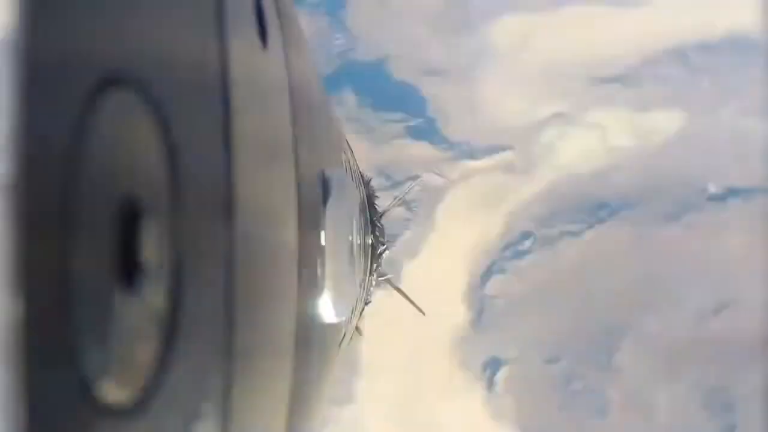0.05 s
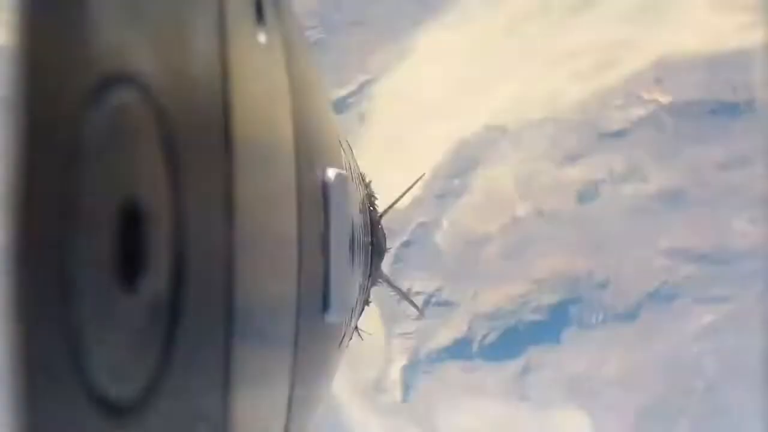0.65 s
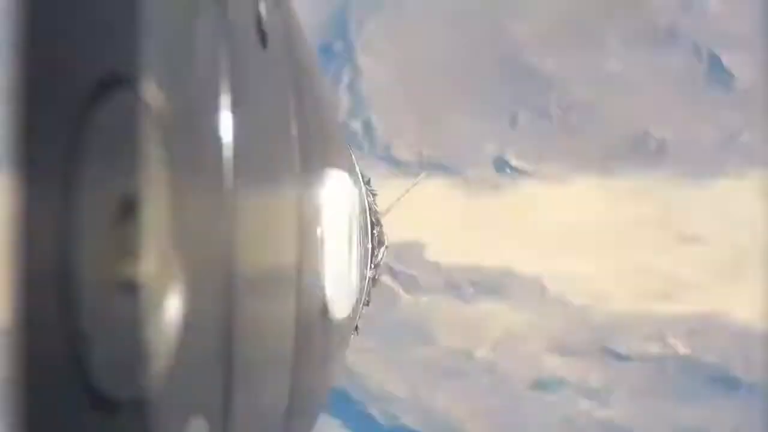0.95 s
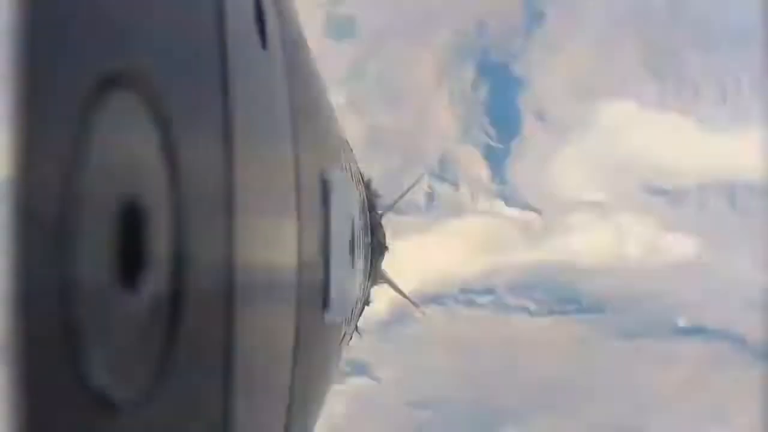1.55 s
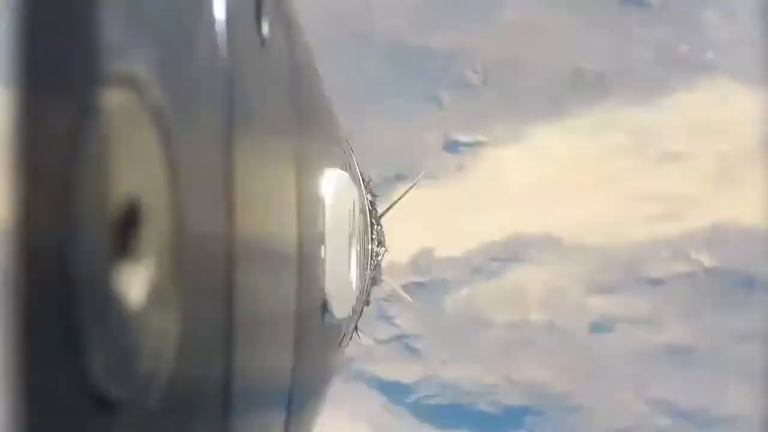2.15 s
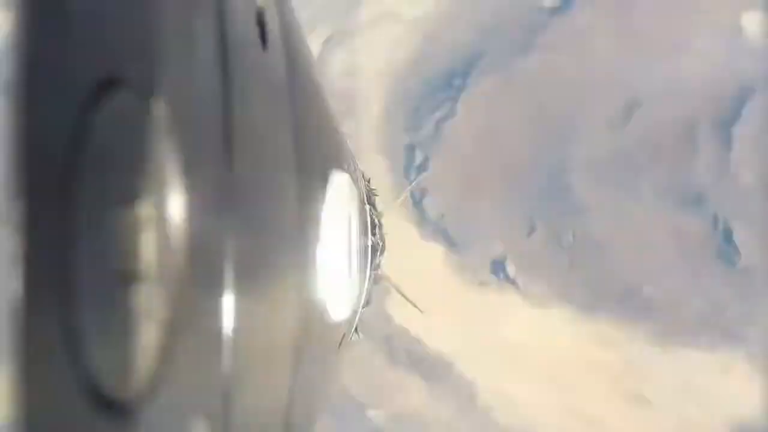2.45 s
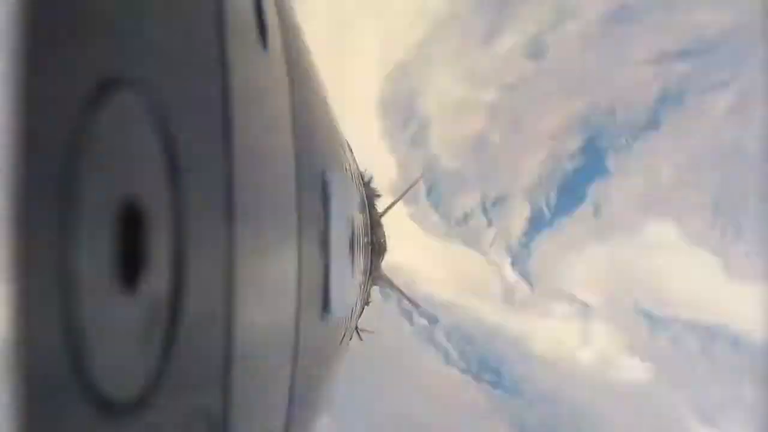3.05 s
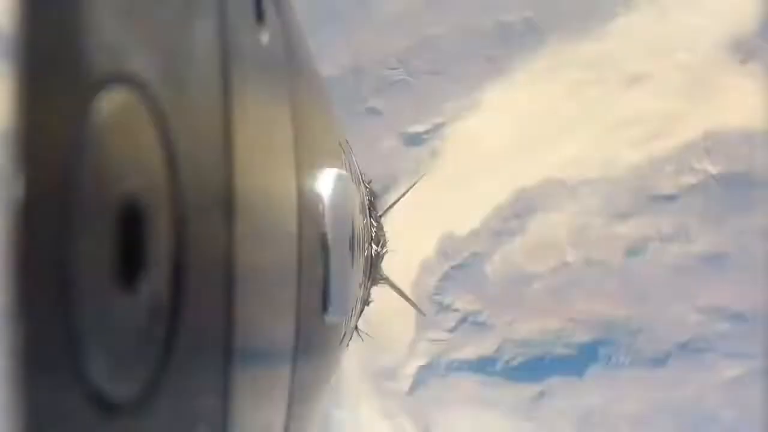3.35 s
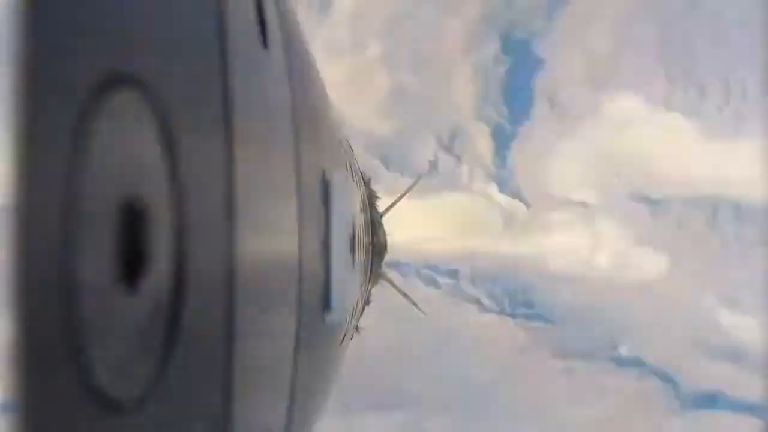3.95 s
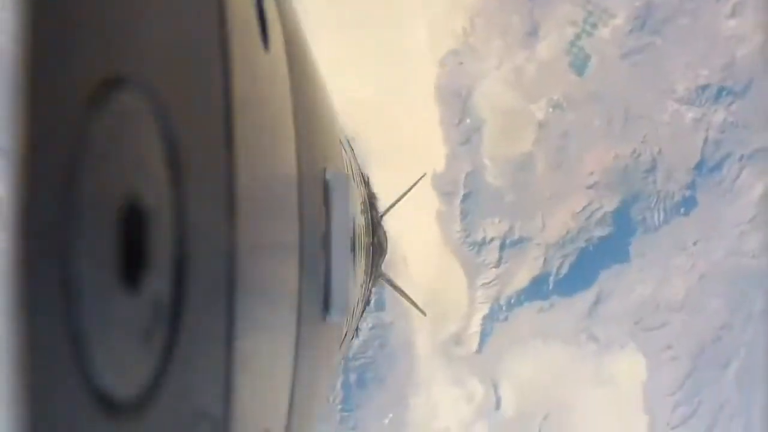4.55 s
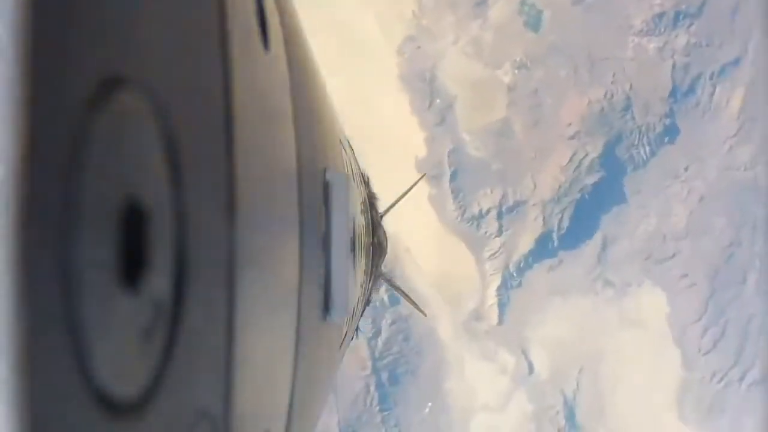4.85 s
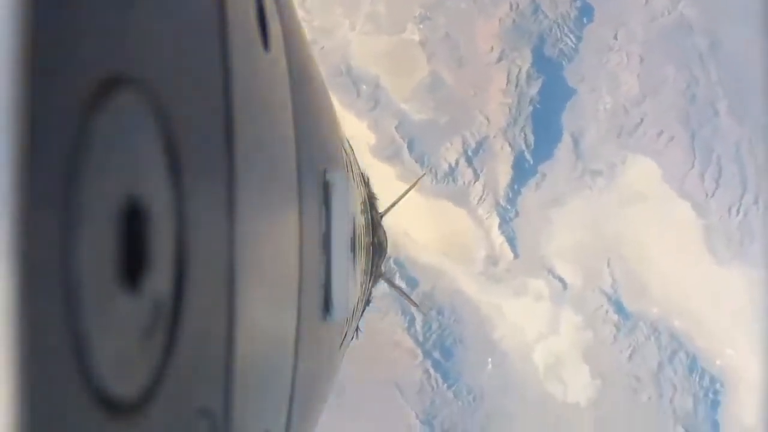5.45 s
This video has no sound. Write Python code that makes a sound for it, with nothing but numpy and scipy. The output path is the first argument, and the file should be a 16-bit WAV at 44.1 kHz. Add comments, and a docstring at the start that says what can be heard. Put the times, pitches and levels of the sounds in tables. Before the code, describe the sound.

A low metal hull hum with scattered knocks, then a loud burst of clattering, groaning and cable scraping that ends in a sharp bang.

```python
"""Aboard a spinning rocket above the air, where sound travels through the hull.
The hull hums, and loose parts knock. Two weights on cables are fired loose to stop the spin.
The cables whirr, scrape off the hull and make it groan, then let go with a bang.
A small camera overloads and holds each of its slow samples, which mirrors the sound into the treble."""
import sys
import numpy as np
from scipy import signal
from scipy.fft import rfft, irfft, next_fast_len
from scipy.io import wavfile
from scipy.ndimage import uniform_filter1d

SR = 44100
rng = np.random.default_rng(int(sys.argv[2]) if len(sys.argv) > 2 else 0)


def transcribe(signal):
    """Save signal, clipped to [-1, 1], as a 16-bit WAV file at the path in sys.argv[1]."""
    frames = np.atleast_2d(signal).T
    limited = np.clip(frames, -1, 1)
    pcm = np.round(limited * 32767).astype(np.int16)
    wavfile.write(sys.argv[1], SR, pcm)


N = 250929
T = np.arange(N) / SR
RELEASE_S, LET_GO_S = 3.86, 4.557   # the weights are fired loose; the cables leave the hull


def from_db(db):
    """Turn decibels into a number to multiply by."""
    return 10 ** (np.asarray(db) / 20)


def rms_one(x):
    """Scale a signal to an average strength (rms) of one."""
    return x / np.sqrt(np.mean(x ** 2) + 1e-20)


def noise(spectrum):
    """Noise of strength one; rows of pitch_hz, level_db set only its tone colour."""
    size = next_fast_len(N)
    hz, db = np.transpose(spectrum)
    bins_hz = np.maximum(np.fft.rfftfreq(size, 1 / SR), 1)
    gain = from_db(np.interp(np.log(bins_hz), np.log(hz), db))
    return rms_one(irfft(rfft(rng.standard_normal(size)) * gain, size)[:N])


def drift(rate):
    """A random wobble of strength one that turns about `rate` times a second."""
    knots = rng.standard_normal(N // 8)
    return rms_one(np.interp(T * rate, np.arange(len(knots)), knots))


def add(out, s, sound):
    """Mix a sound in at s seconds."""
    at = max(round(s * SR), 0)
    out[at:at + len(sound)] += sound[:max(N - at, 0)]


def ring(hz, t60, rise):
    """A struck tone builds up for `rise` seconds, then fades by 60 dB in `t60` seconds."""
    t = T[:int((1.3 * t60 + rise) * SR)]
    build = np.sin(np.pi / 2 * np.minimum(t / rise, 1))
    return np.sin(2 * np.pi * hz * t) * build * from_db(-60 * np.maximum(t - rise, 0) / t60)


def resonate(x, hz, width_hz):
    """Let through a narrow band around one pitch."""
    r = np.exp(-np.pi * width_hz / SR)
    feedback = [1, -2 * r * np.cos(2 * np.pi * hz / SR), r * r]
    return signal.lfilter(np.array([1, 0, -1]) * (1 - r * r) / 2, feedback, x)


def burst(s, t60):
    """A loudness curve that jumps up at s seconds and dies away."""
    out = np.zeros(N)
    add(out, s, from_db(-60 * T[:int(1.5 * t60 * SR)] / t60))
    return out


def swell(s, half_length):
    """A loudness curve that rises to its top at s seconds and falls again."""
    return np.exp(-.5 * np.minimum(((T - s) / half_length) ** 2, 100))


# Tone colour of the faint hiss: pitch_hz, level_db
HISS_COLOUR = [(20, -10), (60, 1), (200, -7), (700, -16.5), (4400, -13.5), (8000, -23), (10000, -43)]

def hiss():
    """A faint, even hiss."""
    return from_db(-67.5) * noise(HISS_COLOUR)


# Tone colour of the hull's hum and the camera's hiss: pitch_hz, level_db
HUM_COLOUR = [(20, -9.5), (55, -1), (105, 0), (144, -0.5), (275, -1.5), (424, -6), (560, -12), (700, -11),
              (900, -19), (1500, -22), (3280, -27.5), (4900, -29.5), (5700, -36)]

def hum():
    """The hull hums, its low part swelling and sinking; a thin electronic whine joins after the spin."""
    steady = noise(HUM_COLOUR)
    low = signal.sosfilt(signal.butter(1, 670, fs=SR, output="sos"), steady)
    restless = (from_db(1.2 * drift(16)) - 1) * low
    whine = from_db(-71) * np.clip((T - 4.8) / 0.65, 0, 1) * np.sin(2 * np.pi * 4807 * T)
    return from_db(-43.5) * (steady + restless) + whine


# Tone colour of a loose part's scratch: pitch_hz, level_db
TICK_COLOUR = [(250, 7), (850, -1), (1150, 2), (1500, -7.5), (2300, 2), (3400, -14.5), (5600, -15.5)]

def ticks(rows):
    """Each knock starts with a brief scratch as the part touches."""
    contact = sum(from_db(db) * burst(s, t60=0.091) for s, *_, db in rows)
    return uniform_filter1d(contact, size=180) * noise(TICK_COLOUR)


# Loose parts knocking: start_s, thud_db, clank_db, clank_hz, tick_db
PART_KNOCKS = [(0.213, -34.5, -53, 700, -49), (0.410, -35, -55, 726, -46), (0.514, -29.5, -43.5, 697, -38),
               (0.814, -31.5, -41, 794, -42.5), (1.079, -39, -42, 740, -49), (1.134, -32, -46, 702, -47),
               (1.434, -36, -50, 700, -52), (1.508, -20.5, -19, 696, -43.5),
               (2.206, -36.5, -35.5, 816, -41), (2.240, -35.5, -45, 813, -56), (2.638, -33, -56, 710, -60),
               (2.677, -47, -40, 718, -55), (2.752, -23.5, -44, 750, -44.5),
               (2.789, -23.5, -33.5, 695, -57), (2.854, -30, -40, 720, -43.5), (2.894, -26, -46, 700, -60),
               (2.924, -31.5, -28.5, 700, -54), (3.030, -38.5, -39, 690, -46.5),
               (3.127, -47, -38.5, 699, -48), (3.330, -26, -47, 685, -54), (3.470, -30.5, -51, 686, -56),
               (5.085, -45, -29.5, 645, -45.5), (5.447, -50, -41, 680, -47), (5.552, -55, -43, 724, -58)]
# Tones of a thudding mount: pitch_hz, level_db, fade_s
MOUNT_TONES = [(260.7, -1.5, 0.15), (292, -3, 0.12)]
# Tones of a clanking part: times_clank_pitch, level_db, fade_s
PART_TONES = [(0.759, -15, 0.24), (0.997, 3, 0.11), (1.15, -9.5, 0.091), (3.3, -24.5, .025)]

def knocks():
    """Loose parts bump their mounts and bounce once: the soft mount thuds, the hard part clanks."""
    thud_rise_s, clank_rise_s = 0.011, 0.004
    faint_knocks = [(when * N / SR, -49 + 7 * thud, -58 + 7 * clank, 650 + 200 * pitch, -64 + 9 * tick)
                    for when, thud, clank, pitch, tick in rng.random((36, 5))]
    rows = PART_KNOCKS + faint_knocks
    out = np.zeros(N)
    for s, thud_db, clank_db, clank_hz, _ in rows:
        thud = [(hz, thud_db + db, t60, thud_rise_s) for hz, db, t60 in MOUNT_TONES]
        clank = [(clank_hz * times, clank_db + db, t60, clank_rise_s) for times, db, t60 in PART_TONES]
        for hz, db, t60, rise in thud + clank:
            sound = from_db(db + rng.normal(0, 1)) * ring(hz * (1 + rng.normal(0, 0.0097)), t60, rise)
            add(out, s, sound)
            add(out, s + rng.uniform(0.02, 0.036), from_db(-15) * sound)   # the bounce
    return out + ticks(rows)


def free_length():
    """The share of each cable that has unwound, growing from 0.3 to 1."""
    return np.clip((T - RELEASE_S) / (LET_GO_S - RELEASE_S), 0.3, 1)


FULL_CABLE_HZ = 616   # pitch of a fully unwound cable

def whirr():
    """The tight cable whirrs, lower and louder as it lengthens; its octave swells briefly."""
    length = free_length()
    phase = 2 * np.pi * np.cumsum(FULL_CABLE_HZ / length) / SR
    tone = drift(110) * np.sin(phase) + drift(110) * np.cos(phase)
    octave = drift(110) * np.sin(2 * phase) + drift(90) * np.cos(2 * phase)
    sound = from_db(-29) * length ** 3.9 * tone + from_db(-47) * swell(4.31, 0.09) * octave
    return sound * (T > RELEASE_S) * (T < LET_GO_S)


# Quick slips of a cable: peak_s, level_db, half_length_s
CABLE_ZIPS = [(4.194, -33.5, 0.012), (4.337, -34, 0.01), (4.366, -33, 0.012), (4.696, -35, 0.0023)]

def zips():
    """A cable that slips fast makes a bright zip."""
    loudness = sum(from_db(db) * swell(s, half_length) for s, db, half_length in CABLE_ZIPS)
    return loudness * rms_one(resonate(rng.standard_normal(N), hz=5130, width_hz=680))


# Bright tones of the hull's skin: pitch_hz, width_hz, level_db
SKIN_TONES = [(1902, 67, 9.5), (2670, 67, -8), (2955, 54, 9), (3970, 165, 1.5), (4306, 110, 8.5),
              (4540, 52, -1)]

def skin(grit):
    """The hull's skin adds its own bright ring to scrapes and cracks."""
    ringing = sum(from_db(db) * resonate(grit, hz, width) for hz, width, db in SKIN_TONES)
    return from_db(-2) * (grit + ringing)


# Cables pressing on the hull: peak_s, rise_s, fall_s, rumble_db, scrape_db
CABLE_RUBS = [(3.867, 0.0089, 0.074, -17, -34), (4.047, 0.085, 0.04, -11.5, -50),
              (4.45, 0.45, 0.14, -19, -29), (4.688, 0.073, 0.04, -20, -33)]

def rubs():
    """Each rub presses harder, then lifts off; gives its pressure curve and its two levels."""
    return [(np.interp(T, [s - rise, s, s + fall], [0, 1, 0]), rumble_db, scrape_db)
            for s, rise, fall, rumble_db, scrape_db in CABLE_RUBS]


# Tone colour of the shaking hull: pitch_hz, level_db
RUMBLE_COLOUR = [(30, -50), (62, -1.5), (95, -53), (140, 0), (230, -4.5), (330, 8.5), (400, -2),
                 (500, -8.5), (680, -13), (850, -30.5), (1300, -34), (2000, -46.5)]

def rumble():
    """The rubs shake the hull, which stores some of the energy and rumbles on."""
    stored_share, fade_s = 0.17, 0.77
    power = sum((from_db(db) * pressure ** 0.48) ** 2 for pressure, db, _ in rubs())
    keep = from_db(-60 / (fade_s * SR)) ** 2
    lingering = signal.lfilter([1 - keep], [1, -keep], power)
    return np.sqrt(power + stored_share * lingering) * noise(RUMBLE_COLOUR)


# Tone colour of a scraping cable: pitch_hz, level_db
SCRAPE_COLOUR = [(300, 14.5), (900, -11), (1400, -19), (2000, 8.5), (2600, 7.5), (3400, 10), (4300, 7),
                 (5600, 3)]

def scrape():
    """The cables grind over the skin in uneven slips, and single strands catch and snap free."""
    snaps_per_s, snap_fade_s, echo_share = 37, 0.0092, 0.34
    loudness = sum(from_db(db) * pressure for pressure, _, db in rubs())
    slips = rms_one(from_db(1.3 * drift(550) + 1.8 * drift(60)))
    grind = noise(SCRAPE_COLOUR) * loudness * slips
    catches = (rng.random(N) < snaps_per_s / SR) * rng.random(N)
    snaps = signal.lfilter([1], [1, -from_db(-60 / (snap_fade_s * SR))], catches + 1e-18)
    grind *= 0.93 + 1.4 * snaps
    # the grinding runs along the cable and back, so its colour falls as the cable lengthens
    echo_s = (1 + 0.02 * drift(40)) * free_length() / FULL_CABLE_HZ
    return skin(sum(echo_share ** trip * np.interp(T - trip * echo_s, T, grind) for trip in range(3)))


# Low hull groans and two brief, higher cable whines: peak_s, pitch_hz, level_db, half_length_s
SWELLING_TONES = [(3.967, 296.6, 0, 0.013), (3.998, 664, -15, 0.0051), (4.04, 316.2, -6.5, 0.05),
                  (4.125, 223, -20, 0.072), (4.125, 1510, -49, .025), (4.205, 1210, -36.5, 0.011),
                  (4.248, 131.4, -22.5, 0.021), (4.343, 186, -19.5, 0.02), (4.47, 137.7, -19, 0.08),
                  (4.519, 653, -13, 0.026), (4.711, 61.6, -34, 0.15)]

def groans_and_whines():
    """The sliding cables make the hull groan in low, swelling tones, and twice whine briefly."""
    out, waver = np.zeros(N), 0.049 * drift(64)
    for s, hz, db, half_length in SWELLING_TONES:
        tone = swell(s, half_length) * np.sin(2 * np.pi * hz * (T - s) + waver)
        # the tone's peaks are clipped, adding a slight overloaded buzz
        out += from_db(db) * np.clip(tone, -0.9, 0.9)
    return out


# Hard blows on the hull: start_s, thump_db, thump_fade_s, crack_db
HULL_BLOWS = [(3.8601, 5, 0.032, -4.5), (3.888, -20, 0.037, -40), (3.909, -10, 0.047, -53),
              (3.938, -18, 0.036, -31), (3.951, -16, .05, -25.5), (3.989, -3.5, 0.014, -38),
              (4.023, 1, 0.06, -30), (4.055, 5.5, 0.016, -35), (4.106, -16, 0.043, -24.5),
              (4.19, -31, .04, -28), (4.366, -8, 0.12, -27), (4.557, 10, 0.032, -21),
              (4.619, -0.5, 0.011, -29.5), (4.644, -7, 0.0081, -55), (4.688, -15.5, 0.013, -28.5)]
# Tones of the struck hull: pitch_hz, level_db, fade_s
HULL_TONES = [(134.6, -48, 0.57), (186.4, -43, 0.79), (229, -39, 0.88), (307, -31, 0.27), (347, -38, 0.38),
              (377.6, -33, 1), (406, -32, 0.99), (689, -38, 0.3), (792, -27, 0.084)]

def blows():
    """Each blow is a short, heavy thump that leaves the hull ringing."""
    out = np.zeros(N)
    for s, db, thump_fade_s, _ in HULL_BLOWS:
        thump_hz = 285 + 70 * (s - RELEASE_S)   # higher as the cables unwind
        add(out, s, from_db(db) * ring(thump_hz, thump_fade_s, rise=0.0028))
        for hz, tone_db, t60 in HULL_TONES:
            gain = from_db(db + tone_db + rng.normal(0, 1)) * rng.choice([-1, 1])
            add(out, s, gain * ring(hz, t60, rise=0.0019))
    return out


# Tone colour of a blow's crack: pitch_hz, level_db
CRACK_COLOUR = [(300, 2), (900, 9), (1700, -11), (2700, 8), (3400, 0), (4400, 1), (5600, -2)]

def cracks():
    """Each blow starts with a sharp crack that rings the skin."""
    loudness = sum(from_db(db) * burst(s, t60=0.029) for s, *_, db in HULL_BLOWS)
    return skin(loudness * noise(CRACK_COLOUR))


# Tone colour of the low stereo noise: pitch_hz, level_db
STEREO_NOISE_COLOUR = [(15, 18), (45, 9), (70, 27), (110, 6), (200, 1), (400, -34), (1300, -80),
                       (5000, -78), (9000, -60)]

def low_stereo_noise():
    """A faint, low noise between left and right that rises at the loud moments of the blows."""
    loudness = sum(from_db(db - 52) * burst(s, t60=0.25) for s, db, *_ in HULL_BLOWS)
    return loudness * noise(STEREO_NOISE_COLOUR)


def scene():
    """The rocket sounds the same left and right; faint hiss and low noise add a little width."""
    cables = whirr() + zips() + rumble() + scrape() + groans_and_whines()
    middle = hum() + knocks() + cables + blows() + cracks()
    side = hiss() + low_stereo_noise()
    return np.array([middle + side, middle - side])


def record(dry):
    """The camera cuts the treble, squashes loud peaks and holds each sample as a step."""
    hold_hz, overload_hardness = 11988, 3.24
    narrow = signal.sosfilt(signal.cheby1(8, .3, 5600, fs=SR, output="sos"), dry)
    squashed = narrow / (1 + np.abs(narrow) ** overload_hardness) ** (1 / overload_hardness)
    # the steps mirror each sound around the hold rate, more strongly the higher it is
    size = next_fast_len(N + SR // 10)
    mirrored = rfft(squashed * (1 + 2 * np.cos(2 * np.pi * hold_hz * T)), size)
    step_gain = np.sinc(np.fft.rfftfreq(size, 1 / SR) / hold_hz)
    held = irfft(mirrored * step_gain, size)[:, :N]
    return signal.sosfilt(signal.ellip(10, .2, 80, 15500, fs=SR, output="sos"), held)


dry = scene()
out = record(dry)
transcribe(out)
```